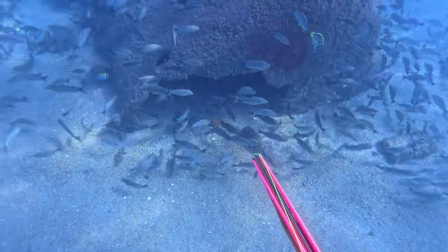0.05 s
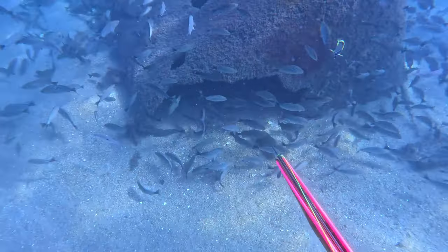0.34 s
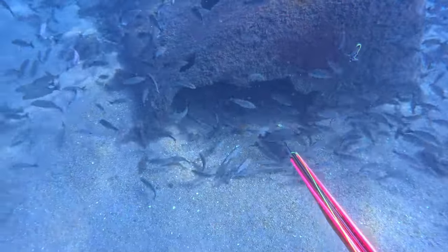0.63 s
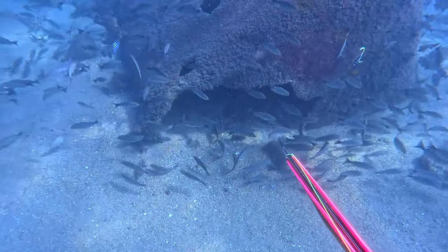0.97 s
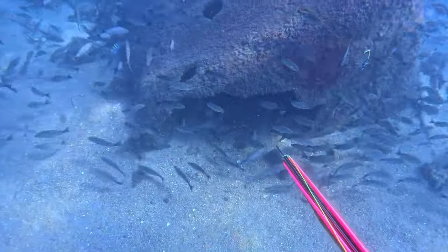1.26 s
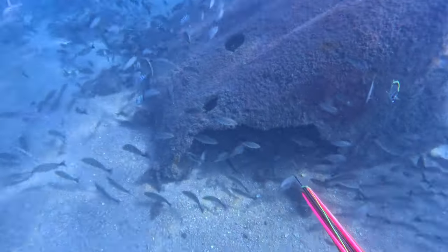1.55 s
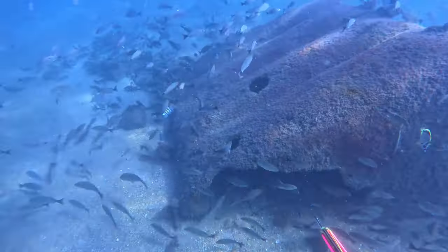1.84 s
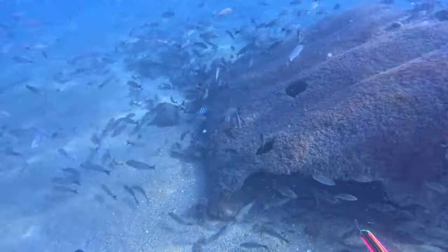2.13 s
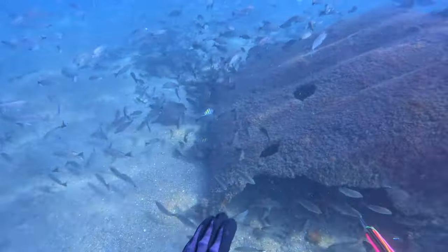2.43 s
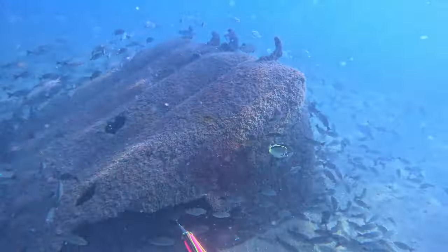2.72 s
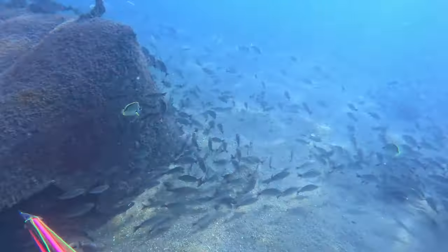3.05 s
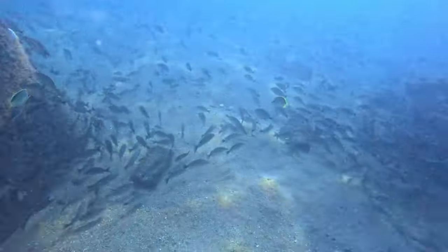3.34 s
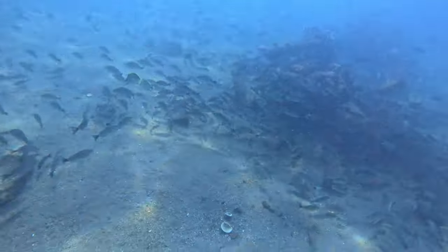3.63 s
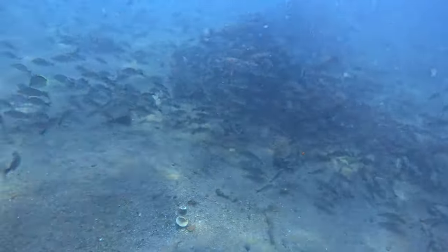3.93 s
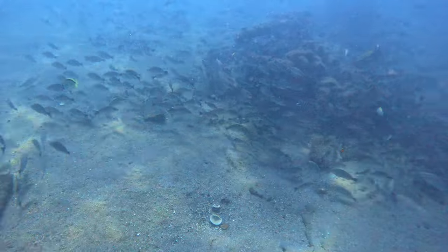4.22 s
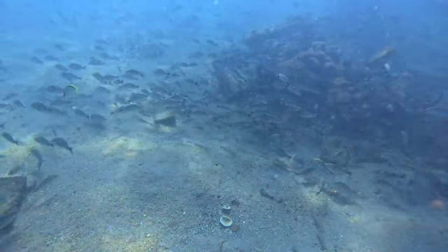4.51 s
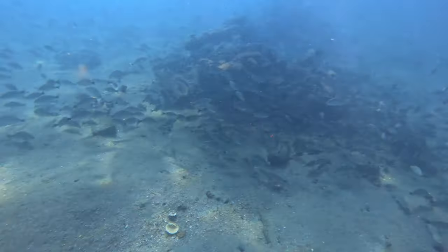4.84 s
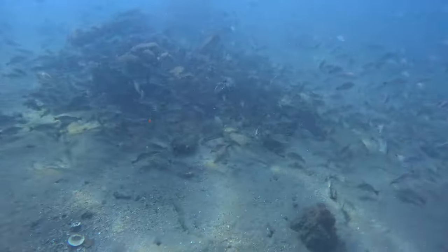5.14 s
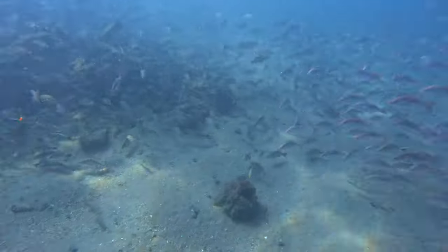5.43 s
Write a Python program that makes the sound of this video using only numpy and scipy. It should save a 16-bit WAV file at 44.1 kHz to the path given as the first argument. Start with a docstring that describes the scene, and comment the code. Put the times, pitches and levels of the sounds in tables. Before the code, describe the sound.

Underwater, dull knocks thump on a camera housing amid gulping bubbles, a low rumble and the faint sizzle of snapping shrimp.

```python
"""On a reef, underwater, heard from one microphone inside a drifting camera's watertight housing.
Right at the microphone, knocks thump the air in the housing, rubs grate on its wall, and pockets of air
gulp free and ring as bubbles. Water rumbles and swishes past as the camera turns from rock to open sand.
Snapping shrimp crack nearby; thousands further off merge into a soft sizzle, coloured by the wall."""
import sys
import numpy as np
from scipy import signal
from scipy.fft import rfft, irfft
from scipy.io import wavfile
from scipy.ndimage import uniform_filter1d

SR = 44100
rng = np.random.default_rng(int(sys.argv[2]) if len(sys.argv) > 2 else 0)


def file_out(sig):
    """Save sig as 16-bit WAV at sys.argv[1]."""
    # one column per channel
    cols = np.atleast_2d(sig).T
    # limit, then scale
    lim = np.clip(cols, -1, 1)
    pcm = np.round(lim * 32767).astype(np.int16)
    wavfile.write(sys.argv[1], SR, pcm)


N = 245637
TIME = np.arange(N) / SR

# Flow along the housing. Each row: time in seconds, relative rumble level in dB.
FLOW_LEVELS = [(0.0, -44.5), (0.43, -42.5), (0.6, -52.5), (0.79, -48), (1.13, -46), (2.51, -41.5),
               (2.73, -35), (3.04, -44), (3.26, -47), (3.74, -41), (4.1, -38.5), (4.45, -50), (5.06, -39.5),
               (5.57, -42)]
# Colour of that rumble. Each row: frequency in Hz, relative level in dB.
RUMBLE_SPECTRUM = [(6, -1), (15, 6.5), (45, -4), (100, -15.5), (200, -27), (400, -48), (1000, -60),
                   (4000, -110)]
# Shrimp in the distance. Each row: time in seconds, relative level in dB.
SIZZLE_LEVELS = [(0.0, -56), (0.94, -58.5), (1.27, -56), (2.68, -54.5), (2.95, -59.5), (5.57, -58.5)]
# Resonances of the housing wall. Each row: centre in Hz, width in Hz, gain in dB,
# extra gain in dB while facing the rock.
WALL_MODES = [(660, 160, -8.5, -2.5), (822, 66, -4, 1), (1237, 360, -9.5, -1.5), (1673, 550, -4, 6),
              (2150, 520, -6, -8), (2534, 750, -7, 7), (2932, 520, -1, -18.5), (3310, 1000, -10, 3.5),
              (3736, 244, -4, 4), (4380, 1350, -10.5, 2), (5340, 490, -16, 2), (5980, 700, -16.5, 1),
              (7120, 890, -23.5, 3), (8640, 2100, -27.5, 2)]
# Colour of the lapping and spurting water. Each row: frequency in Hz, relative level in dB.
SWISH_SPECTRUM = [(60, 8), (170, 10), (320, -0.5), (480, -1), (720, 5), (1050, -16.5), (2000, -43),
                  (8000, -82)]
# The strongest spurts along the housing. Each row: start in seconds, length in seconds, rms level in dB.
SPURTS = [(0.489, 0.084, -46.5), (0.78, 0.11, -38), (0.918, 0.044, -54), (1.07, 0.07, -49),
          (1.309, 0.073, -49), (1.562, 0.15, -50), (1.863, 0.07, -52), (2.023, 0.15, -46.5),
          (2.545, 0.09, -36.5), (2.908, 0.078, -53), (3.164, 0.13, -56), (5.265, 0.029, -45.5)]
# Knocks on the housing. Each row: start in seconds, peak level in dB.
HOUSING_KNOCKS = [(0.2015, -7.5), (0.276, -17), (0.2885, -4.5), (0.408, -13), (0.572, -5), (0.588, -24),
                  (0.8595, -8), (1.1768, -33), (1.231, -10), (1.2925, -29), (1.3022, -21), (1.3391, -9),
                  (1.6098, -23), (2.0229, -19.5), (2.33, -29.5), (2.6083, -24.5), (2.6533, -5),
                  (2.6738, -20.5), (2.7285, -15), (2.7376, -19.5), (2.815, -14), (2.8475, -10.5),
                  (2.8505, -4.5), (3.058, -19.5), (3.313, -31.5), (3.8629, -22.5), (4.0055, -14),
                  (4.0697, -7.5), (4.1765, -10), (4.189, -15.5), (4.7137, -20), (5.016, -8.5),
                  (5.0788, -7.5)]
# How a knock reaches the microphone inside. Each row: frequency in Hz, relative gain in dB.
KNOCK_SPECTRUM = [(5, -18.5), (25, 4), (70, 1.5), (150, -2), (400, -13), (900, -21.5), (1600, -24),
                  (3000, -30.5), (5000, -41.5), (8500, -57), (11000, -76.5), (15000, -80.5), (20000, -105)]
# The nearest shrimp. Each row: start in seconds, peak level in dB before muffling, centre in Hz.
NEAR_SNAPS = [(0.536, -39, 4130), (.899, -45, 5000), (1.279, -47.5, 6500), (1.485, -37, 1780),
              (2.0408, -38.5, 6300), (2.153, -35.5, 5560), (2.533, -38, 3640), (2.889, -44, 5200),
              (2.9445, -46.5, 7500), (3.799, -42, 5600), (3.869, -38.5, 8000), (3.941, -38, 2180),
              (4.404, -37, 2280), (4.512, -44, 2230), (4.583, -42.5, 4840), (5.130, -35.5, 3050)]
# Gritty rubs on the housing. Each row: start in seconds, length in seconds, rms level in dB, centre in Hz.
HOUSING_RUBS = [(0.773, 0.089, -52, 1640), (1.602, 0.009, -47, 1110), (1.636, 0.0078, -43, 1330),
                (2.541, 0.063, -46.5, 800), (2.572, 0.021, -45, 1600), (2.926, 0.013, -46, 2200),
                (5.266, 0.015, -49, 870)]
# Air pockets gulping free. Each row: start in seconds, pitch in Hz, peak level in dB,
# lead of the forerunner in seconds, pitch of the splinter in Hz.
AIR_POCKETS = [(0.817, 142, -9.5, 0.022, 643), (1.038, 105, -26.5, .048, 844),
               (2.589, 71, -22, 0.0225, 693), (2.74, 133, -28.5, .023, 740), (3.544, 113, -19, 0.031, 697),
               (5.266, 129.5, -27, .02, 786)]
# Single small bubbles. Each row: start in seconds, pitch in Hz, peak level in dB, cycles until silent.
SMALL_BUBBLES = [(.807, 288, -23, 49), (0.816, 1930, -42, 45), (0.822, 2810, -32, 93),
                 (2.077, 730, -40, 18), (2.222, 4150, -31.5, 24), (2.575, 1880, -32, 41),
                 (3.793, 713, -33.5, 7.9), (3.849, 3070, -38, 37), (4.918, 1755, -37, 18),
                 (5.193, 1700, -41.5, 27), (5.271, 1180, -37.5, 14)]

TURN_S = (2.8, 3.6)  # start and end of the turn from rock to sand


def undb(db):
    """Decibels to gain."""
    return 10 ** (np.asarray(db) / 20)


def unit(x):
    """Scale to rms 1."""
    return x / np.sqrt(np.mean(x ** 2) + 1e-18)


def add(track, start_s, sound):
    """Mix a sound into the track."""
    i = max(int(round(start_s * SR)), 0)
    part = track[i:i + len(sound)]
    part += sound[:len(part)]


def gains(points, size):
    """Gain of each frequency bin from (Hz, dB) points."""
    hz, db = np.transpose(points)
    return undb(np.interp(np.log(np.fft.rfftfreq(size, 1 / SR) + 1e-9), np.log(hz), db))


def colour(x, points):
    """Give a sound a spectrum, at rms 1."""
    return unit(irfft(rfft(x) * gains(points, len(x)), len(x)))


def resonate(x, hz, q):
    """One broad resonance."""
    hz = min(hz, .4 * SR)
    return signal.lfilter(*signal.iirpeak(hz, max(q, 3 * hz / SR), fs=SR), x)


def walk(rate):
    """A smooth random wander at rms 1, changing rate times a second."""
    hold = int(SR / rate)
    steps = rng.standard_normal(N)[np.arange(N) // hold]
    return unit(uniform_filter1d(uniform_filter1d(steps, hold), hold))


def crackle(rate, spread_db):
    """Random clicks, about rate a second, most small and a few large."""
    clicks = (rng.random(N) < rate / SR) * rng.standard_normal(N)
    return clicks * undb(spread_db * np.minimum(rng.exponential(size=N), 5))


def through_wall(x, mode_db):
    """Pass a sound through the resonances of the housing wall, at rms 1."""
    bin_hz = np.fft.rfftfreq(len(x), 1 / SR)
    power = sum((undb(db) / (1 + (2 * (bin_hz - hz) / width) ** 2)) ** 2
                for (hz, width, *_), db in zip(WALL_MODES, mode_db))
    return unit(irfft(rfft(x) * np.sqrt(power), len(x)))


def flow_rumble(gain_db=6, open_sand_db=1.0, eddy_db=4.5):
    """Eddies press on the housing as a low, uneven rumble, a little stronger over the open sand."""
    db = np.interp(TIME, *np.transpose(FLOW_LEVELS)) + gain_db
    db += np.interp(TIME, TURN_S, (0, open_sand_db))
    db += eddy_db * walk(rate=17)
    return colour(rng.standard_normal(N), RUMBLE_SPECTRUM) * undb(db)


def shrimp_sizzle(gain_db=1, rock_pops_db=-17, sand_pops_db=-12, smear_s=0.0092):
    """Countless distant snaps merge into a hiss; away from the rock it dulls and soft pops stand out."""
    turned = np.interp(TIME, TURN_S, (0, 1))
    pop_gain = undb(rock_pops_db + turned * (sand_pops_db - rock_pops_db))
    smear = np.hanning(int(smear_s * SR))
    snaps = rng.standard_normal(N)
    for hz in (1830, 2910, 4100, 8040):
        bursts = np.sqrt(np.convolve(crackle(rate=60, spread_db=2.1) ** 2, smear))[:N]
        snaps += pop_gain * unit(resonate(bursts * rng.standard_normal(N), hz, q=3.3))
    _, _, mode_db, rock_db = np.transpose(WALL_MODES)
    facing_rock = through_wall(snaps, mode_db + rock_db)
    facing_sand = through_wall(snaps, mode_db)
    sizzle = (1 - turned) * facing_rock + turned * facing_sand
    return sizzle * undb(np.interp(TIME, *np.transpose(SIZZLE_LEVELS)) + gain_db)


def water_swishes(gurgle_db=1.5, lap_rock_db=-62, lap_sand_db=-77, lap_spread_db=4):
    """Water laps at the housing, less once turned from the rock; each spurt swells, gurgles and fades."""
    water = colour(crackle(rate=2000, spread_db=5.0), SWISH_SPECTRUM)
    water *= undb(gurgle_db * walk(rate=58))
    lap_db = np.interp(TIME, TURN_S, (lap_rock_db, lap_sand_db)) + lap_spread_db * walk(rate=19)
    out = water * undb(lap_db)
    for at, length, db in SPURTS:
        spurt = water[int(at * SR):int((at + length) * SR)]
        add(out, at, undb(db) * unit(spurt * np.sqrt(np.hanning(len(spurt)))))
    return out


def knocks(flex_hz=254, flex_q=0.66, size=16384):
    """Right at the microphone: a sharp tick, then a dull, damped thump as the housing flexes back."""
    # minimum phase puts the tick at the very front
    cepstrum = irfft(np.log(gains(KNOCK_SPECTRUM, size)))
    cepstrum[1:size // 2] *= 2
    cepstrum[size // 2 + 1:] = 0
    # the bass comes late: an all-pass around the flexing of the wall
    s = 1j * np.fft.rfftfreq(size, 1 / SR) / flex_hz
    all_pass = (s * s - s / flex_q + 1) / (s * s + s / flex_q + 1)
    thump = irfft(np.exp(rfft(cepstrum)) * all_pass)[:size // 2]
    thump /= np.abs(thump).max()
    out = np.zeros(N)
    for at, db in HOUSING_KNOCKS:
        add(out, at, -undb(db) * thump)
    return out


def stray_snaps(per_s=3, level_db=-47, spread_db=2, centre_hz=4000, spread_octaves=.8, db_per_octave=-3.5):
    """Faint random snaps, in rows like NEAR_SNAPS; duller ones come through the wall more strongly."""
    when, strength, pitch = rng.random((int(per_s * N / SR), 3)).T
    octaves = spread_octaves * (2 * pitch - 1)
    db = level_db + db_per_octave * octaves + spread_db * (2 * strength - 1)
    return list(zip(when * N / SR, db, centre_hz * 2 ** octaves))


def shrimp_snaps(rattle_cycles=6, q=1.28, echo_s=0.0098, echo_db=-12.5, muffle_hz=10000):
    """A nearby claw snap rattles briefly and echoes once off the surface, about 10 ms later."""
    out, t = np.zeros(N), TIME[:1024]
    for at, db, hz in list(NEAR_SNAPS) + stray_snaps():
        age = t * hz / rattle_cycles  # duller snaps are further off and more smeared
        for lag, path_db in ((0, 0), (echo_s, echo_db)):
            rattle = rng.standard_normal(len(t)) * np.sqrt(age) * np.exp(-age)
            crack = resonate(resonate(rattle, hz, q), hz, q)
            add(out, at + lag, undb(db + path_db) * crack / np.abs(crack).max())
    return signal.sosfilt(signal.butter(3, muffle_hz, fs=SR, output="sos"), out)


def rubs(focus_db=7):
    """Tiny slips on the housing swell and fade, ringing mostly the resonances near each rub's centre."""
    out, slips = np.zeros(N), crackle(rate=1700, spread_db=2.0)
    mode_hz, _, mode_db, _ = np.transpose(WALL_MODES)
    for at, length, db, hz in HOUSING_RUBS:
        focused_db = mode_db - focus_db * np.log2(mode_hz / hz) ** 2
        grit = through_wall(slips[int(at * SR):int((at + length) * SR)], focused_db)
        add(out, at, undb(db) * unit(grit * np.hanning(len(grit))))
    return out


def gulp(at, hz, db, lead_s, splinter_hz):
    """An air pocket breaks into four bubbles, in rows like SMALL_BUBBLES."""
    return [(at - lead_s, hz * 1.56, db - 11.5, 10.5),  # a smaller forerunner
            (at, hz, db, 6.5),  # the pocket itself
            (at + 0.0057, hz * 2, db - 7, 10.5),  # a piece that splits off
            (at + 0.005, splinter_hz, db - 16, 39)]  # a splinter


def bubbles(rise=0.044, onset_cycles=0.78):
    """Each bubble of air rings and rises a little in pitch as it dies away."""
    out = np.zeros(N)
    pieces = [piece for pocket in AIR_POCKETS for piece in gulp(*pocket)]
    for at, hz, db, cycles in pieces + list(SMALL_BUBBLES):
        elapsed_cycles = np.arange(int(cycles / hz * SR)) * hz / SR
        age = elapsed_cycles / cycles
        onset = 1 - np.exp(-elapsed_cycles / onset_cycles)
        decay = undb(-60 * age)
        ring = np.sin(2 * np.pi * elapsed_cycles * (1 + rise * age)) * decay * onset
        add(out, at, undb(db) * ring / np.abs(ring).max())
    return out


def scene():
    """Everything that reaches the one microphone: sounds at the housing, then shrimp out on the reef."""
    at_housing = knocks() + bubbles() + rubs() + water_swishes() + flow_rumble()
    return (at_housing + shrimp_snaps() + shrimp_sizzle())[None]


def record(dry):
    """The camera cuts the highest treble steeply."""
    top_hz = 15500
    return signal.sosfilt(signal.ellip(8, .2, 70, top_hz, fs=SR, output="sos"), dry)


dry = scene()
out = record(dry)
file_out(out)
```